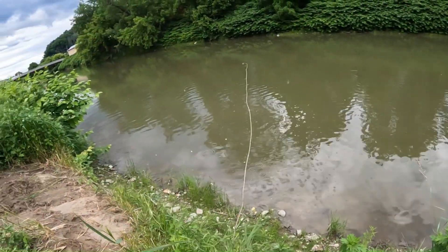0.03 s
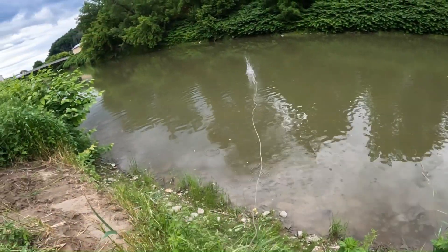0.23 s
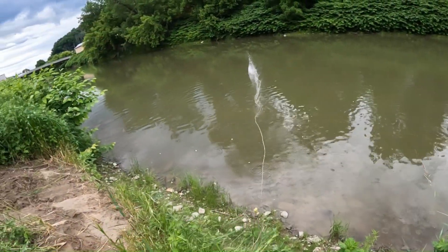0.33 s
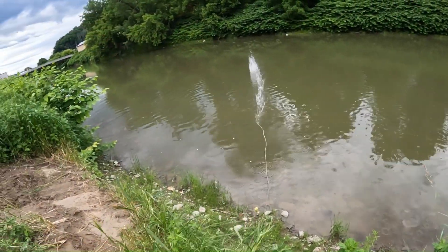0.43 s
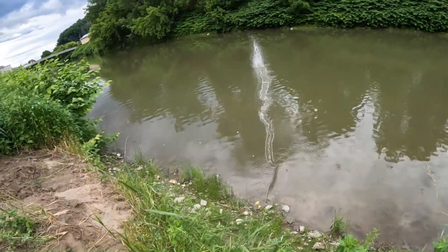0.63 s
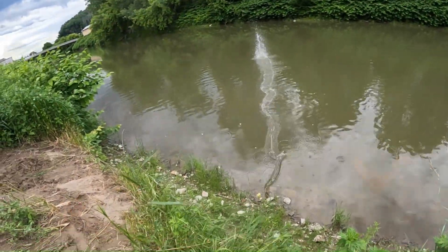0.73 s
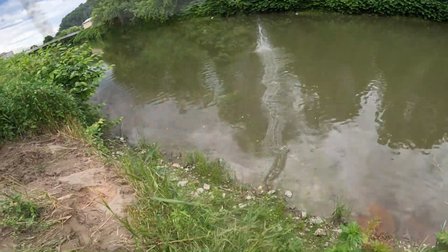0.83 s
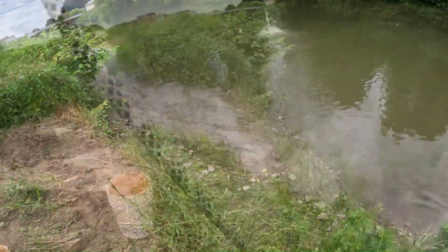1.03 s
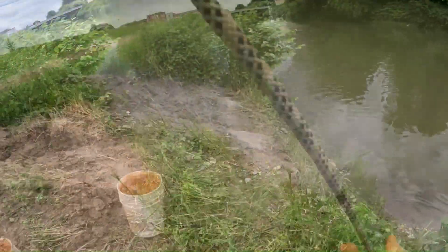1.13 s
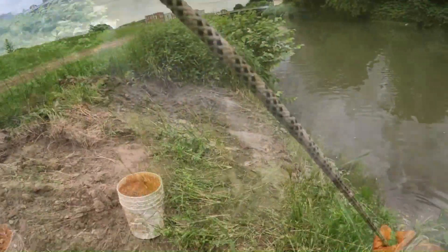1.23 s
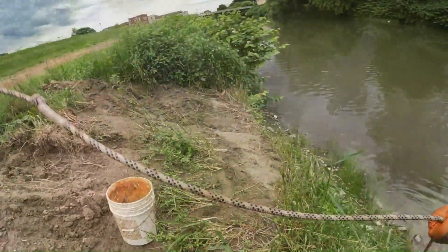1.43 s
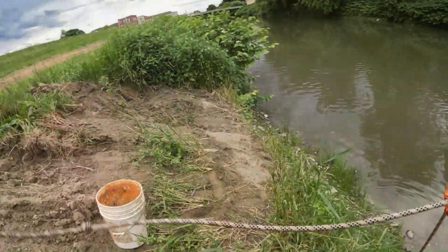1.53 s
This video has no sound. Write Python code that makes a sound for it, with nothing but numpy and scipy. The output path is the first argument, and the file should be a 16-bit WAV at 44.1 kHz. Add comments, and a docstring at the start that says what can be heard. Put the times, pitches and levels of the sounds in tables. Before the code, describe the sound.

A weighted rope plunks and splashes into calm river water, over faint wind.

```python
"""A calm riverbank: faint outdoor air, wind rumbling on the microphone and the hiss of rope running out.
The rope's weight hits the river with a ringing plunk, then a gulp as the air pocket closes.
The rope slaps down along the water in spray and small bubbles. As the splash dies away in stray drips,
the background opens out in stereo and the microphone takes a few soft handling bumps."""
import sys
import numpy as np
from scipy import signal
from scipy.fft import rfft, irfft
from scipy.io import wavfile

SR = 44100
rng = np.random.default_rng(int(sys.argv[2]) if len(sys.argv) > 2 else 0)


def output_pcm(signal):
    """Save a mono or channel-first signal as 16-bit PCM at the path in sys.argv[1].

    Samples are clipped to [-1, 1] before scaling.
    """
    pcm = np.clip(np.atleast_2d(signal).T, -1, 1) * 32767
    wavfile.write(sys.argv[1], SR, np.round(pcm).astype(np.int16))


N = 70560

# tone of the outdoor air bed: f/Hz, gain/dB
AIR_EQ = [(30, -4), (150, 2), (300, -7.5), (900, -20), (1600, -18), (3500, -26), (7500, -30), (9000, -40.5),
          (12800, -45), (14000, -57)]
# tone of the wind rumble: f/Hz, gain/dB
WIND_EQ = [(8, -14.5), (28, 3), (45, -4.5), (70, -7), (110, -17.5), (170, -23), (300, -36.5), (800, -71)]
# gusts on the microphone: t/s, level/dB
WIND_FADER = [(0.0, -43.5), (0.08, -35), (0.15, -45.5), (0.22, -35), (0.29, -43), (0.43, -34.5),
              (0.56, -45.5), (0.73, -34.5), (0.87, -41.5), (1.15, -44), (1.22, -39), (1.33, -42.5),
              (1.45, -40), (1.6, -42)]
# side channel of air and wind, from near mono to wide: t/s, gain/dB
BED_SIDE_FADER = [(0.0, -40), (0.55, -38), (0.8, -23.5), (1.0, -6.5), (1.6, -3)]
# extra EQ on each of those side channels: f/Hz, gain/dB
AIR_SIDE_EQ = [(150, -17.5), (500, -7.5), (1200, 1.5), (3000, 0), (8000, -6.5)]
WIND_SIDE_EQ = [(30, -2), (90, -7), (200, -11)]
# soft handling bumps: t/s, f/Hz, level/dB
HANDLING_BUMPS = [(0.065, 65.5, -38), (1.008, 106.3, -39), (1.199, 98.3, -32.5), (1.403, 91, -35),
                  (1.484, 73.5, -33.5)]

# hiss of the running rope: t/s, level/dB
ROPE_FADER = [(0.0, -48), (0.045, -56.5), (0.09, -47.5), (0.15, -54), (0.21, -46), (0.28, -52.5),
              (0.34, -48), (0.55, -50.5), (0.66, -49.5), (0.73, -52.5), (0.82, -53), (0.86, -60),
              (1.05, -73), (1.6, -57.5)]
# tone of that hiss, and extra EQ on its side channel: f/Hz, gain/dB
ROPE_EQ = [(400, 9.5), (1200, 3), (2500, 0), (5500, -1), (7600, -1), (8800, -12.5), (11000, -12),
           (12700, -5), (14000, -20), (16000, -24)]
ROPE_SIDE_EQ = [(500, -36), (5000, -27.5), (8000, -28), (11000, -9.5), (15000, 4)]
# swell and tail of the spray: t/s, level/dB
SPRAY_FADER = [(0.0, -55.5), (0.3, -49), (0.36, -45), (0.425, -43.5), (0.47, -46.5), (0.59, -43.5),
               (0.65, -45.5), (0.73, -50), (0.79, -48), (0.87, -53), (1.15, -54.5), (1.6, -65.5)]
# tone of the spray: f/Hz, gain/dB
SPRAY_EQ = [(500, 1), (1300, 3), (2300, 5.5), (3500, 2.5), (4800, -3.5), (5800, -9.5), (7500, -16),
            (9000, -27), (14000, -66)]
# swell and tail of the churning water: t/s, level/dB
CHURN_FADER = [(0.0, -54), (0.31, -52.5), (0.35, -46.5), (0.43, -36), (0.51, -36.5), (0.595, -44.5),
               (0.64, -39.5), (0.74, -45.5), (0.85, -48), (1.1, -46), (1.3, -50.5), (1.6, -56.5)]
# tone of the churning: f/Hz, gain/dB
CHURN_EQ = [(100, 2.5), (200, -4), (360, 2), (510, -3), (650, -2), (880, -0.5), (1150, -2), (1450, -17.5),
            (2500, -37.5)]

# slaps of rope and weight: t/s, pre-EQ level/dB, attack/s, t60/s, centre f/Hz, width/octaves
WATER_SLAPS = [(0.068, -48, 0.019, 0.25, 2670, 1.24), (0.224, -35, 0.0016, 0.064, 1290, 2.0),
               (0.322, -34.5, 0.0042, 0.18, 1520, 1.5), (0.329, -35.5, 0.0065, 0.14, 3500, 1.8),
               (0.396, -36, 0.013, 0.13, 2040, 1.14), (0.496, -42, 0.0045, 0.1, 3220, 0.57),
               (0.539, -45, 0.0022, 0.033, 6000, 1.2), (0.615, -43.5, 0.0055, .12, 1980, 1.6),
               (0.66, -39, .002, 0.015, 3950, 0.88), (0.69, -41.5, 0.0048, .06, 2360, 0.83),
               (0.985, -52, 0.0074, .07, 2640, 0.35), (1.152, -56, .008, .09, 2930, 0.3),
               (1.305, -52.5, .008, 0.11, 2700, 0.6), (1.366, -48, 0.0048, 0.11, 1280, 1.43)]
# sharp drips: t/s, f/Hz, level/dB
DRIP_TICKS = [(0.7651, 4000, -29), (0.7668, 5100, -26), (0.7694, 5200, -38)]
# a first plip, the gulp, then stragglers: t/s, f/Hz, level/dB, attack/s, t60/s, glide/(share of f per s)
LARGE_BUBBLES = [(0.2255, 890, -32, 0.0022, 0.056, -0.5), (0.228, 326, -42, 0.015, 0.22, -3.5),
                 (0.274, 169, -38, 0.011, 0.1, 1), (0.3918, 287, -9, 0.0083, 0.031, 21),
                 (0.3886, 131.6, -17, 0.015, 0.046, -6.5), (0.3928, 164.5, -23.5, 0.0083, 0.26, 2.35),
                 (0.3944, 864, -19, 0.0094, 0.041, -.6), (0.3887, 664, -32.5, .0024, 0.092, 1),
                 (0.3922, 1059, -32, 0.0046, 0.11, 7), (0.3918, 1890, -30, 0.0068, 0.038, -27.5),
                 (0.4017, 2150, -35, 0.008, 0.021, -1), (0.434, 320, -27.5, 0.0068, 0.068, -0.7),
                 (0.474, 409.5, -34.5, 0.013, 0.17, -0.2), (0.496, 314.6, -34, 0.0085, 0.18, 0.2),
                 (0.526, 816, -29.5, 0.0096, 0.045, 1.7), (0.569, 377, -31, 0.0034, 0.056, -0.5),
                 (0.622, 360, -30, 0.003, .09, -1.5), (0.632, 899, -35, 0.0066, 0.087, 0.5),
                 (0.664, 290, -31.5, .003, 0.022, .3), (0.690, 758, -33, 0.0044, 0.06, 4),
                 (0.767, 1336, -39.5, 0.0024, 0.032, -3), (0.838, 556, -41, 0.0056, 0.24, 1.5),
                 (0.898, 900, -37, 0.0027, 0.03, 2), (0.993, 2810, -49.5, 0.0055, .07, 1.7),
                 (1.088, 377, -40.5, 0.0064, 0.15, 3), (1.095, 202, -43.5, 0.014, 0.14, 3.5),
                 (1.292, 314, -43.5, 0.0032, 0.11, 1)]
# hits of the weight on the water: t/s, gain/dB
WEIGHT_HITS = [(0.3228, -3), (0.33, -1)]
# hollow modes of the plunk: f/Hz, level/dB relative to the hit, t60/s
PLUNK_MODES = [(126.2, -24, 0.33), (260.7, -25.5, 0.25), (301, -7.5, 0.033), (417, -21, 0.16),
               (546, -32, .045), (846, -28, 0.094), (920, -22, 0.078), (1119, -26, 0.075),
               (1328, -30.5, 0.046)]


def undb(db):
    """Decibels to gain."""
    return 10 ** (np.asarray(db) / 20)


def unit(x):
    """Scale to rms 1."""
    return x / np.sqrt(np.mean(x ** 2) + 1e-18)


def fader(rows):
    """A gain ride through rows of t/s, level/dB."""
    return undb(np.interp(np.arange(N) / SR, *np.array(rows).T))


def bin_octaves():
    """Octave position of each spectral bin."""
    return np.log2(np.maximum(np.fft.rfftfreq(N, 1 / SR), 1))


def eq(x, rows):
    """Filter by rows of f/Hz, gain/dB."""
    hz, db = np.array(rows).T
    return irfft(rfft(x) * undb(np.interp(bin_octaves(), np.log2(hz), db)), N)


def noise(rows):
    """Coloured noise of rms 1."""
    return unit(eq(rng.standard_normal(N), rows))


def stereo(mid, side):
    """Left and right from mid and side."""
    return np.array([mid + side, mid - side])


def envelope(age, attack, t60):
    """A smooth attack, then an exponential decay."""
    onset = np.sin(np.pi / 2 * np.clip(age / attack, 0, 1)) ** 2
    return onset * np.exp(-np.log(1000) * np.maximum(age - attack, 0) / t60)


def ring(start, hz, attack, t60, glide=0):
    """A damped tone whose pitch may bend up or down."""
    age = np.maximum(np.arange(N) / SR - start, 0)
    return envelope(age, attack, t60) * np.sin(2 * np.pi * hz * age * (1 + glide * age / 2))


def droplets(per_s=5000, scatter_db=2.5):
    """A dense patter of tiny clicks of uneven size."""
    hits = rng.random(N) < per_s / SR
    polarity = np.sign(rng.standard_normal(N))
    return hits * polarity * undb(scatter_db * np.clip(rng.standard_normal(N), -2, 2))


def bubble_swarm(per_s, low_hz, high_hz, cycles, scatter_db, climb=0.077, max_count=3200):
    """Small bubbles at random moments, each a short rising tone of its own size."""
    out, draws = np.zeros(2 * N), rng.random((max_count, 4))
    starts = np.cumsum(-np.log(1 - draws[:, 0])) / per_s
    for start, (_, pitch, size, life) in zip(starts, draws):
        if start * SR >= N:
            break
        hz = low_hz + (high_hz - low_hz) * pitch
        t60 = cycles * (.5 + life) / hz
        age = np.arange(min(int(t60 * SR), N)) / SR
        tone = envelope(age, 1 / hz, t60) * np.sin(2 * np.pi * hz * age * (1 + climb * age / t60))
        gain = np.sqrt(hz) * undb(scatter_db * min(-np.log(1 - size), np.pi))
        i = int(start * SR)
        out[i:i + len(age)] += gain * tone
    return out[:N]


def outdoor_air(level_db=-49):
    """A faint, steady bed that widens as the microphone turns."""
    mid = noise(AIR_EQ)
    side = fader(BED_SIDE_FADER) * eq(noise(AIR_EQ), AIR_SIDE_EQ)
    return undb(level_db) * stereo(mid, side)


def wind():
    """Gusts rumble on the microphone, widening along with the air."""
    mid = noise(WIND_EQ)
    side = fader(BED_SIDE_FADER) * eq(noise(WIND_EQ), WIND_SIDE_EQ)
    return fader(WIND_FADER) * stereo(mid, side)


def handling():
    """Jostling the microphone gives soft, low thumps."""
    return sum(undb(db) * ring(t, hz, attack=0.012, t60=0.22) for t, hz, db in HANDLING_BUMPS)


def rope_hiss():
    """The rope hisses as it runs out; the hiss sinks away, then creeps back faintly in the tail."""
    return fader(ROPE_FADER) * stereo(noise(ROPE_EQ), eq(noise(ROPE_EQ), ROPE_SIDE_EQ))


def spray(fizz_db=-3):
    """Droplets fall back and fizz as the rope settles along the water."""
    swarm = bubble_swarm(per_s=1500, low_hz=1400, high_hz=7500, cycles=37, scatter_db=3)
    fizz = unit(eq(swarm, SPRAY_EQ))
    patter = unit(eq(droplets(), SPRAY_EQ))
    return fader(SPRAY_FADER) * unit(patter + undb(fizz_db) * fizz)


def churn(wash_db=-4.5):
    """Bubbles in the stirred water gurgle over a soft wash."""
    swarm = bubble_swarm(per_s=1300, low_hz=200, high_hz=1800, cycles=25, scatter_db=2.5)
    gurgle = unit(eq(swarm, CHURN_EQ))
    return fader(CHURN_FADER) * unit(gurgle + undb(wash_db) * noise(CHURN_EQ))


def drips():
    """Stray drops land as tight, bright ticks."""
    return sum(undb(db) * ring(t, hz, attack=.0004, t60=.004) for t, hz, db in DRIP_TICKS)


def slaps():
    """Each slap on the water throws a short burst of droplets."""
    out, t = 0, np.arange(N) / SR
    for start, db, attack, t60, hz, octaves in WATER_SLAPS:
        band = np.exp(-((bin_octaves() - np.log2(hz)) / octaves) ** 2)
        burst = unit(irfft(rfft(droplets()) * band, N))
        out += undb(db) * envelope(t - start, attack, t60) * burst
    return eq(out, [(7800, 0), (8268, -9), (15000, -15)])  # soften the top end


def large_bubbles():
    """Trapped air rings in gliding tones, loudest in the gulp as the pocket closes."""
    return sum(undb(db) * ring(t, hz, attack, t60, glide)
               for t, hz, db, attack, t60, glide in LARGE_BUBBLES)


def plunk(attack_s=0.0021):
    """The weight hits twice in quick succession and rings the same hollow modes."""
    return sum(undb(hit_db + mode_db) * ring(t, hz, attack_s, t60)
               for t, hit_db in WEIGHT_HITS for hz, mode_db, t60 in PLUNK_MODES)


def scene():
    """The splash sits dead centre in a stereo bed."""
    bed = outdoor_air() + wind() + handling() + rope_hiss()
    splash = spray() + churn() + drips() + slaps() + large_bubbles() + plunk()
    return bed + splash


def record(dry, cutoff_hz=15600):
    """A steep high cut on the whole mix."""
    return signal.sosfilt(signal.ellip(8, .2, 70, cutoff_hz, fs=SR, output="sos"), dry)


dry = scene()
out = record(dry)
output_pcm(out)
```